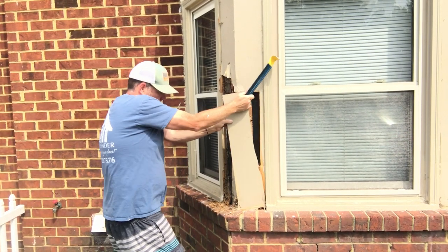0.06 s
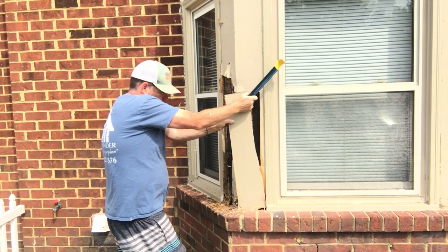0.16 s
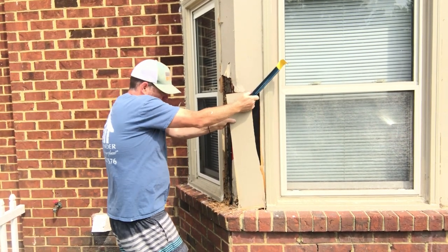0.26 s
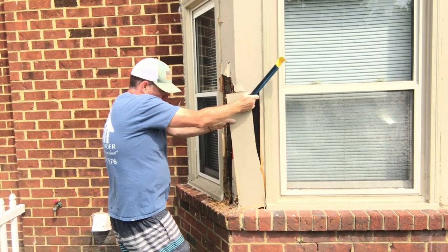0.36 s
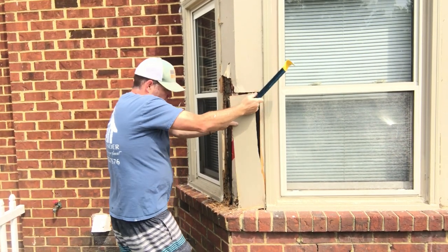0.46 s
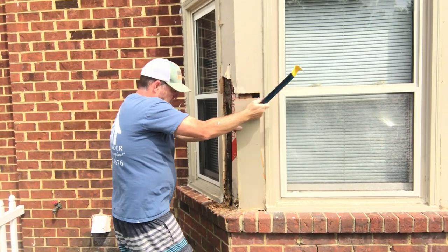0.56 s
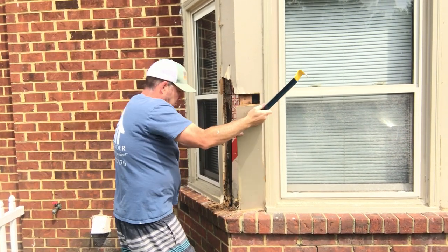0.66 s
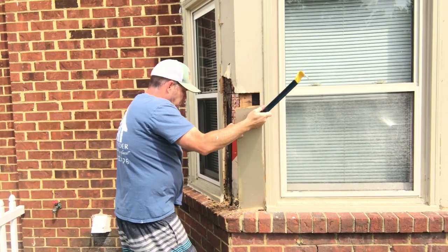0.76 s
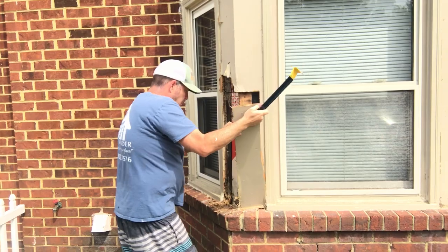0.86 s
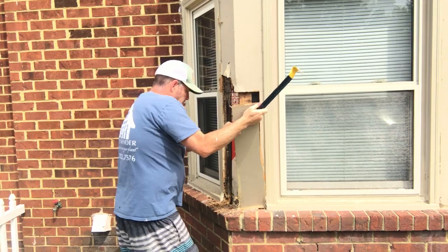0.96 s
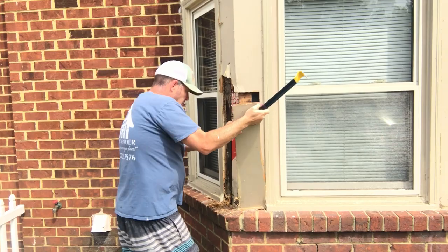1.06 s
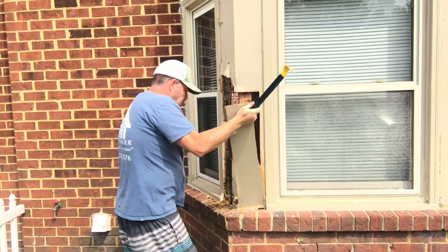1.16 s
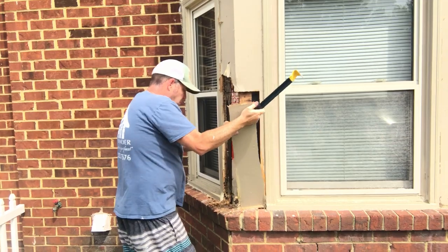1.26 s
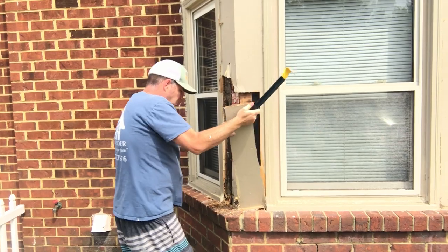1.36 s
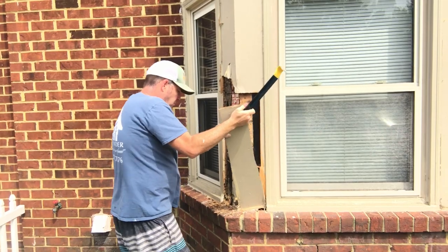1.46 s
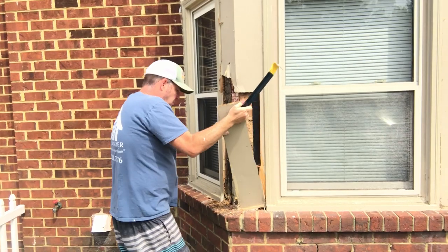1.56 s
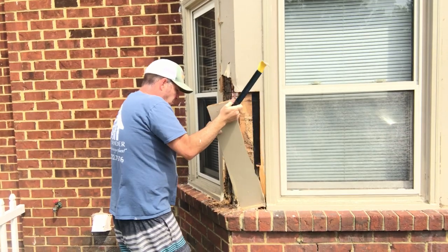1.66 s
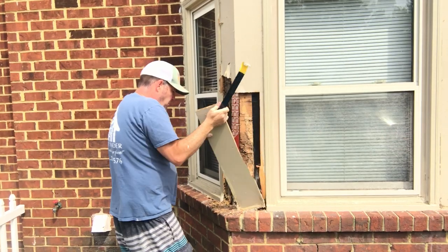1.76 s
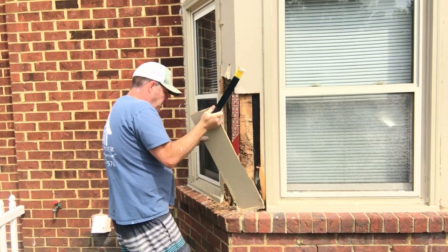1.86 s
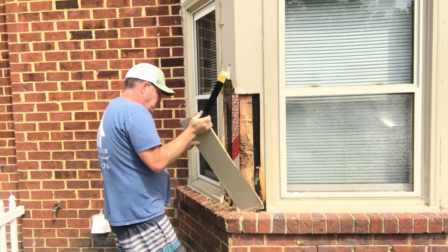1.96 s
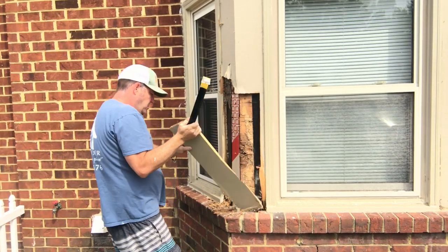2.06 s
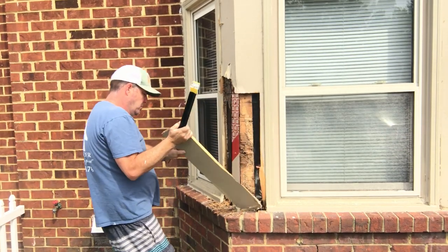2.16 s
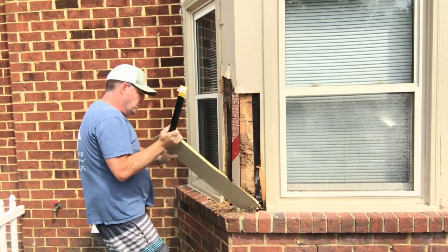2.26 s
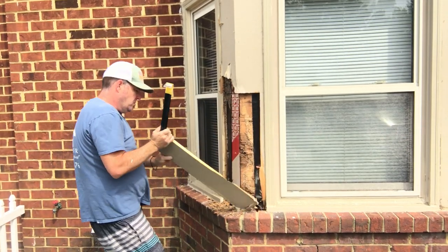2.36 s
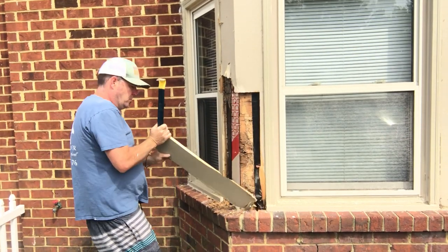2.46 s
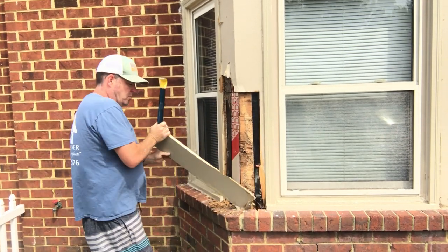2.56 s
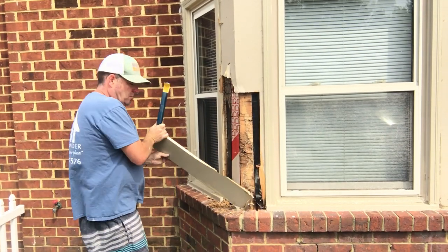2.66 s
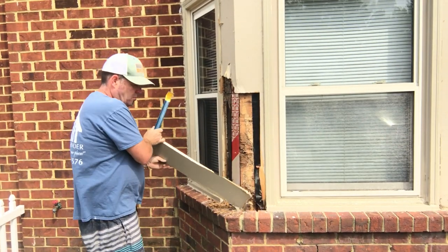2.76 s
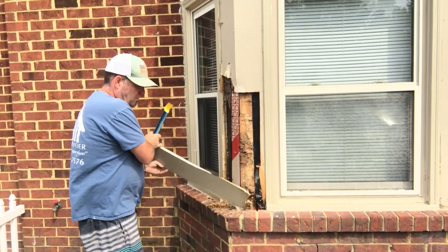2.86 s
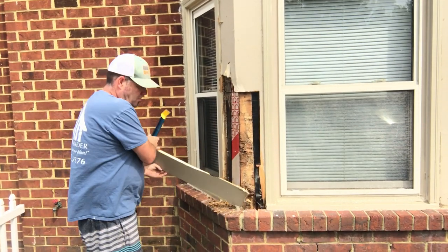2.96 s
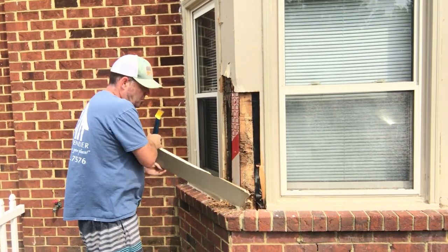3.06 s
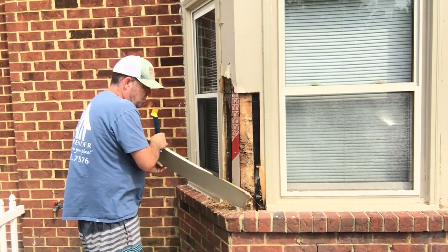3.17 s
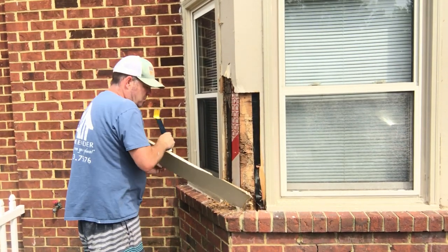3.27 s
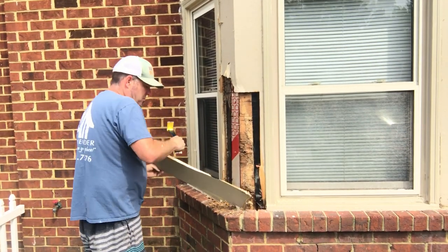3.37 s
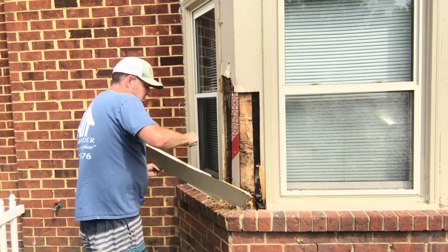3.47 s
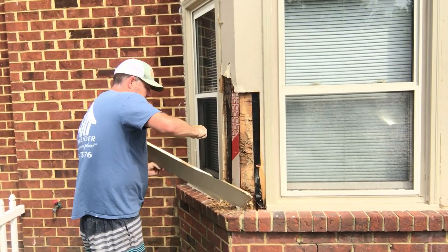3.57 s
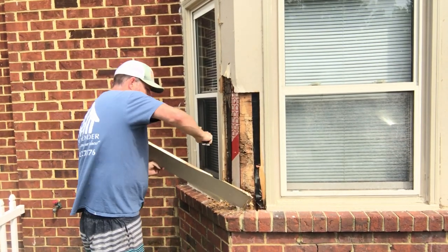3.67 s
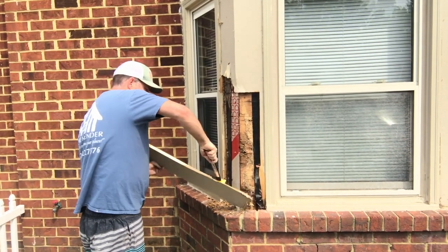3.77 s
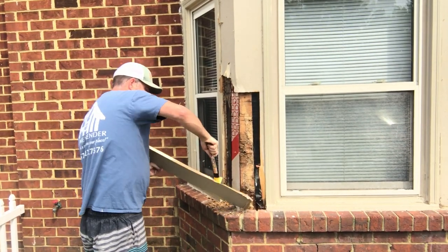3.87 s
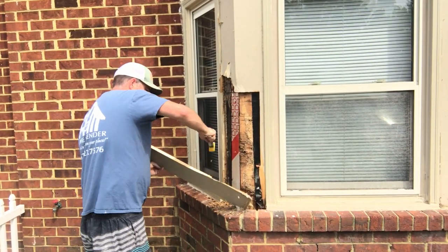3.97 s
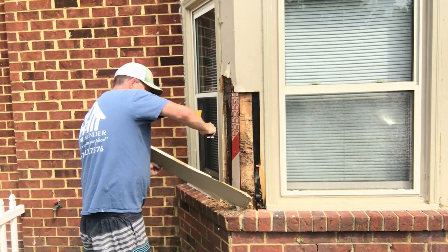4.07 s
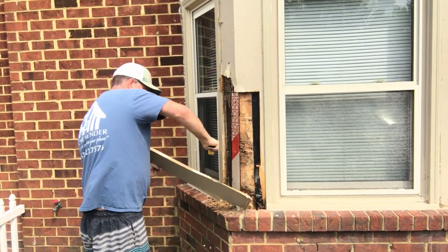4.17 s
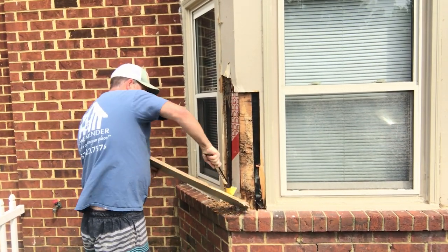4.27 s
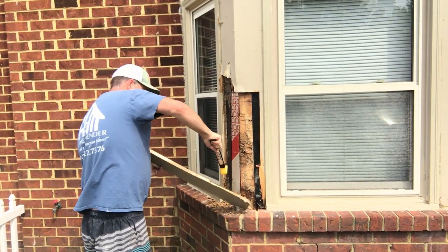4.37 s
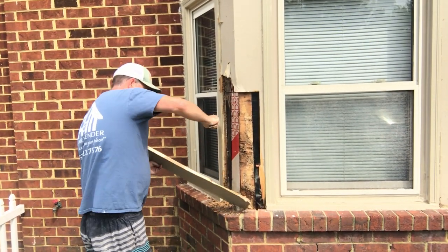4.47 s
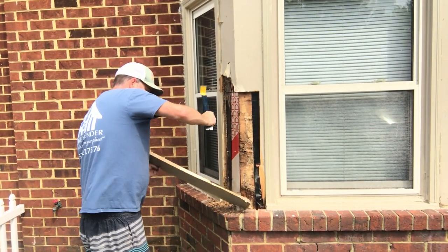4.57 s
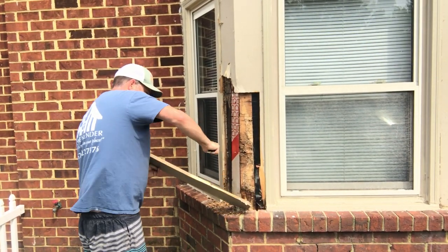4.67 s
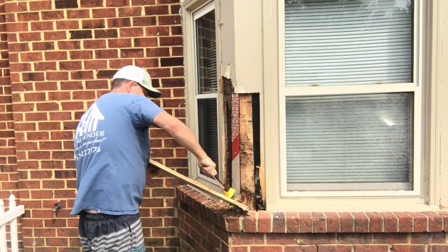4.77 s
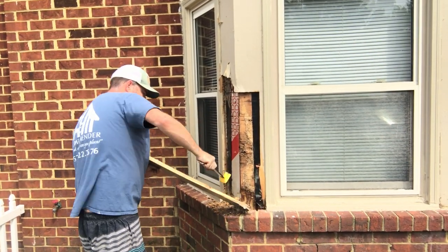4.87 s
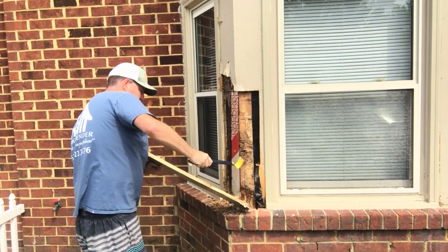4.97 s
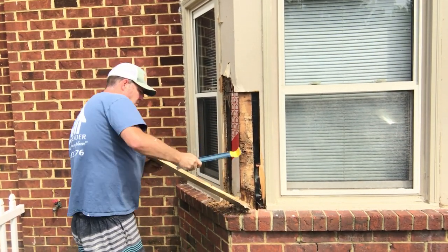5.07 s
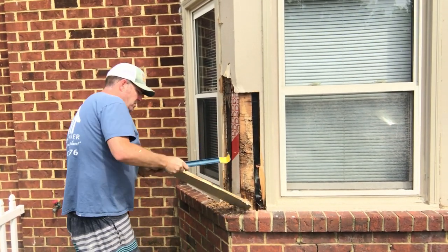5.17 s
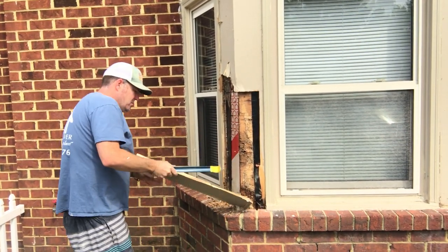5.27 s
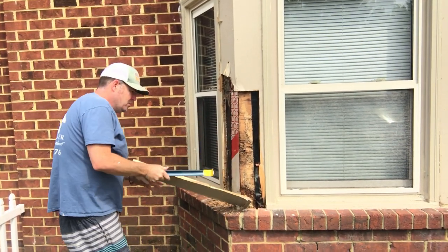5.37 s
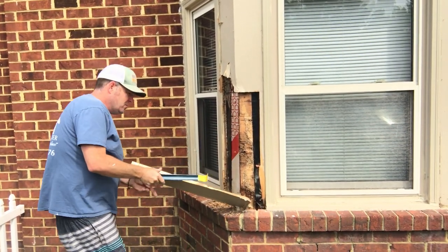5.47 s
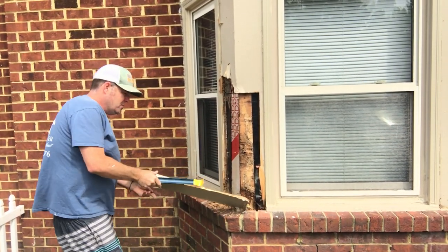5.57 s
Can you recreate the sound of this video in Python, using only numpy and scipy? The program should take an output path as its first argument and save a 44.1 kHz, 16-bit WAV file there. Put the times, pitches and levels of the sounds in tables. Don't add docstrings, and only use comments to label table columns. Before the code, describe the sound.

Wind rumbles and thumps on a microphone in a quiet suburban yard. Small fibre snaps and a few woody knocks come first, then a dense, jerky nail creak, a quick rising squeal, tearing and crumbs. After a lull, a steel bar hits the hanging board three times about half a second apart, hollow and loud with fast rebounds and late echoes. Faint pulsing insects, distant traffic and a fan drone lie behind.

```python
import sys
import numpy as np
from scipy import signal
from scipy.fft import rfft, irfft, next_fast_len
from scipy.io import wavfile
from scipy.ndimage import uniform_filter1d

SR = 44100
rng = np.random.default_rng(int(sys.argv[2]) if len(sys.argv) > 2 else 0)


def digitize_waveform(pressure):
    field = np.atleast_2d(pressure).T
    bounded = np.clip(field, -1, 1)
    quanta = np.round(bounded * 32767).astype(np.int16)
    wavfile.write(sys.argv[1], SR, quanta)


def gain_from_db(level_db):
    decades = np.asarray(level_db, float) / 20
    return 10 ** decades


N = 247401
TIME = np.arange(N) / SR

# [t/s, ring level/dB, crack level/dB, treble re crack/dB, ring tilt/dB per octave]
BAR_BLOWS = [(3.8378, 5.5, -4, -41, 2.5), (3.853, -11.5, -19, -11, 1.5), (3.864, -15, -25, -15, -8),
             (3.8745, -7, -14.5, -28, 2), (3.893, -18.5, -35, -15, 9), (4.2875, 6.5, -3, -23.5, -1),
             (4.297, -9, -30, -11, 2), (4.308, -21, -23, -2, -6), (4.3196, -9, -36, -22, 5),
             (4.339, -24, -36, -15, -1), (4.349, -31, -48, -15, 0), (4.7815, 6, -7, -19, 4.5),
             (4.801, -12, -19, -19, 12), (4.8072, -1.5, -10.5, -27, 6), (4.82, -13, -25, -21, 0),
             (4.833, -26, -29, -19, 4), (4.851, -32, -29, -15, 2)]
# [f/Hz, level/dB, t60/s]
TREBLE_MODES = [(3700, 2.5, 0.0074), (3884, -13, 0.02), (4240, -6.5, 0.012), (5120, -12, 0.009),
                (5700, -7, 0.0048), (6800, -20, 0.0045), (8700, -22.5, 0.0042), (10900, -30, 0.001)]
# [f/Hz, level/dB, t60/s]
NAILED_BOARD = [(341, -8.5, 0.046), (544.5, 3.5, 0.04), (593.5, -6, 0.066), (832, 7, 0.024),
                (990, -13, 0.034)]


def evened(x):
    return x / np.sqrt(np.mean(x ** 2) + 1e-20)


def read(points, hz):
    f, value = np.transpose(points)
    return np.interp(np.log(hz + 1), np.log(f + 1), value)


def curve(rows, axis=1):
    rows = np.array(rows)
    return np.interp(TIME, rows[:, 0], rows[:, axis])


def add(mix, s, sound):
    part = mix[round(s * SR):][:len(sound)]
    part += sound[:len(part)]


def smoothed(x, size):
    return uniform_filter1d(uniform_filter1d(x, size), size)


def colour(x, points):
    size = next_fast_len(len(x))
    gain = gain_from_db(read(points, np.fft.rfftfreq(size, 1 / SR)))
    return evened(irfft(rfft(x, size) * gain, size)[:len(x)])


def lumps(width_s):
    return evened(smoothed(rng.standard_normal(N), max(round(width_s * SR), 2)))


def grains(per_second, spread_db):
    strength = gain_from_db(spread_db * np.minimum(rng.exponential(1, N), 4))
    return strength * rng.standard_normal(N) * (rng.random(N) < per_second / SR)


def bursts(starts, holds, levels_db, rise_db_s, fall_db_s):
    t = TIME[::64, None]
    drop_db = rise_db_s * np.maximum(starts - t, 0) + fall_db_s * np.maximum(t - starts - holds, 0)
    return np.interp(TIME, t[:, 0], np.sqrt((gain_from_db(levels_db - drop_db) ** 2).sum(1)))


def resonate(x, hz, width_hz):
    r = np.exp(-np.pi * width_hz / SR)
    return signal.lfilter([1 - r], [1, -2 * r * np.cos(2 * np.pi * hz / SR), r * r], x)


def ring(modes, rise_s, chance, detune):
    t = np.arange(5000)[:, None] / SR
    hz, db, t60 = np.transpose(modes)
    level_luck, pitch_luck, phase_luck = chance * rng.standard_normal((len(hz), 3)).T
    decay = gain_from_db(db + 4 * level_luck - 60 * t / t60)
    waves = np.sin(2 * np.pi * hz * (1 + detune * pitch_luck) * t + 1.03 * phase_luck)
    sound = (decay * waves).sum(1) * (1 - np.exp(-t[:, 0] / rise_s)) ** 2
    return sound / np.sqrt(uniform_filter1d(2 * sound ** 2, size=120).max())


def reflections(decays, start_s, rise_s):
    taps = np.zeros(SR)
    at = np.arange(0, SR - 20, 20) + rng.integers(0, 20, SR // 20 - 1)
    taps[at] = rng.choice([-1., 1.], len(at))
    hz, t, z = signal.stft(taps, SR, nperseg=256)
    tail = signal.istft(z * gain_from_db(-60 * t / read(decays, hz)[:, None]), SR, nperseg=256)[1]
    tail = tail * (1 - np.exp(-np.arange(len(tail)) / SR / rise_s))
    return np.r_[np.zeros(round(start_s * SR)), tail / np.linalg.norm(tail)]


def blows():
    # [f/Hz, level/dB, t60/s]
    loose_board = [(286, -14.5, 0.082), (327, -10, 0.043), (392, -4.5, 0.074), (450, -11, 0.022),
                   (529, -5, 0.063), (571, -6, 0.044), (607.5, -0.5, 0.063), (705, 3, 0.022),
                   (845, -11.5, 0.078), (877, -9.5, 0.051), (886.3, 1, 0.069), (980, -10.5, 0.02),
                   (1062, -10.5, 0.047), (1155, -9.5, 0.022)]
    # [f/Hz, level/dB, t60/s]
    struck_modes = [(1316, 3, 0.024), (1544, -5.5, 0.085), (1730, -4.5, 0.04), (2500, 11, 0.0023),
                    (1954, 11.5, 0.021), (2070, 5, 0.0085), (2360, 3.5, 0.039), (2498, -0.5, 0.059),
                    (2600, 7, 0.012), (3310, -20, 0.036), (2910, -13, .03), (3840, -22, 0.012),
                    (4130, -15, 0.08)]
    out, shake, t = np.zeros(N), np.zeros(N), np.arange(5000) / SR
    pressed_db = 8.5 / (1 + np.exp((t - .0145) / .0025))
    for s, ring_db, crack_db, treble_db, tilt_db in BAR_BLOWS:
        tilted = [(hz, db + tilt_db * np.log2(hz / 700), t60) for hz, db, t60 in loose_board]
        add(out, s, gain_from_db(crack_db) * ring(struck_modes, 0.00026, 0.37, 0.022))
        add(out, s, gain_from_db(crack_db + treble_db) * ring(TREBLE_MODES, 0.00014, 0.31, 0.035))
        add(out, s + .0006, gain_from_db(ring_db - 7.0 + pressed_db) * ring(tilted, 0.00085, 0.4, 0.0041))
        add(shake, s, gain_from_db(ring_db - 14.5 - 60 * t / 0.11))
    highpass = signal.butter(2, 170, "high", fs=SR, output="sos")
    return signal.sosfilt(highpass, out + shake * clatter())


def clatter():
    # [f/Hz, level/dB per Hz]
    rattle = [(200, -14), (400, 14.5), (900, 4.5), (1500, 1.5), (2500, -4.5), (3500, -10.5), (4500, -23.5),
              (8000, -40), (16000, -62)]
    z = signal.stft(colour(rng.standard_normal(N), rattle), SR, nperseg=128)[2]
    patches = uniform_filter1d(rng.standard_normal(z.shape), size=2, axis=0)
    patches = evened(uniform_filter1d(patches, size=3, axis=1))
    return evened(signal.istft(z * gain_from_db(3.2 * patches), SR, nperseg=128)[1][:N])


def nail_slips():
    # [t/s, tick level/dB, board level/dB, treble re tick/dB, tick f/Hz]
    single_jerks = [(1.7367, -29, -18.5, -16, 1770), (1.7525, -21, -20.5, -2, 1840),
                    (1.7584, -37, -41, -19, 1620), (1.7704, -17, -10.5, -12, 2030),
                    (1.9445, -40, -39.5, 1, 2460), (1.9885, -25.5, -43, -6, 2310),
                    (2.0005, -25.5, -28, -8.5, 1900), (2.1538, -49, -21.5, -30, 1570),
                    (2.1835, -49, -32, -15, 1460), (2.1939, -19.5, -13, -15.5, 2130),
                    (2.2066, -26, -17, -23, 1870), (2.309, -43, -31, -17, 2000),
                    (2.3168, -41, -30, -19, 1720), (2.3235, -43, -30, -17, 2000),
                    (2.3302, -36, -30, -12, 1870)]
    # [t/s, tick level/dB, board level/dB, tick f/Hz]
    notches = [(1.7834, -22, -16, 2000), (1.7955, -29, -20, 2100), (1.8076, -29.5, -19.5, 1590),
               (1.8194, -24, -22.5, 1950), (1.8383, -24, -17.5, 2230), (1.8623, -21, -17.5, 1770),
               (1.8875, -24, -21.5, 2100), (1.9105, -25.5, -22, 1920), (1.931, -25, -20.5, 2000),
               (1.9489, -28, -20, 2280), (1.9646, -25, -18.5, 1900), (1.9774, -22.5, -18.5, 2100),
               (1.9924, -23, -17.5, 2000), (2.0051, -23.5, -16.5, 2100), (2.0169, -24, -17.5, 1900),
               (2.0302, -26, -18.5, 1800), (2.042, -23, -16.5, 2170), (2.0564, -25, -14, 2180),
               (2.0671, -25, -18, 2300), (2.0778, -24, -18.5, 1870), (2.0883, -29, -20.5, 1990),
               (2.1013, -28, -18.5, 1960), (2.1149, -23, -16.5, 2500), (2.1258, -28, -22, 2180),
               (2.139, -26.5, -18, 2160)]
    out = np.zeros(N)
    for row in single_jerks:
        jerk(out, *row, NAILED_BOARD, .28)
    for s, tick_db, board_db, hz in notches:
        treble_db = -19 + 10 * np.log2(hz / 2000) + 4.5 * rng.standard_normal()
        jerk(out, s, tick_db, board_db, treble_db, hz, NAILED_BOARD, .28)
    return out


def squeal():
    # [t/s, jerks per s, tick level/dB, board level/dB]
    run = [
        (2.2175, 139, -35, -25),
        (2.243, 144, -31, -24),
        (2.248, 123, -30, -23),
        (2.27, 128, -29, -24),
        (2.292, 134, -31, -24),
        (2.297, 137, -38, -30),
    ]
    # [t/s, f/Hz]
    glide = [
        (2.22, 1410),
        (2.29, 2160),
    ]
    out = np.zeros(N)
    running = (TIME > run[0][0]) & (TIME < run[-1][0])
    turns = np.ceil(np.cumsum(curve(run) * running) / SR)
    tick_db, board_db = curve(run, axis=2), curve(run, axis=3) - 1.5
    for i in np.flatnonzero(np.diff(turns)):
        late_s, louder_db, higher_hz = rng.standard_normal(3) * [.0001, 1.3, 60]
        hz = np.interp(i / SR, *np.transpose(glide)) + higher_hz
        jerk(out, i / SR + late_s, tick_db[i] + louder_db, board_db[i], -14, hz, NAILED_BOARD, .09)
    return out


def splitting():
    # [t/s, tick level/dB, board level/dB, treble re tick/dB, tick f/Hz]
    snaps = [(0.1115, -37.5, -52, -6, 2080), (1.1645, -36.5, -34, -20, 2100), (1.2257, -36, -53, -5, 3030),
             (1.4132, -44, -59, -5, 2360), (1.5056, -31.5, -40, -27, 2090), (2.393, -45, -32, 2, 2040),
             (2.4647, -38, -36, -8, 2070), (2.5058, -44, -36, -18, 1820), (2.561, -48, -36, -14, 2000),
             (2.644, -44, -55, 3, 2240), (2.6557, -35.5, -29, -7, 1480), (2.7406, -39, -37, 1.5, 2200),
             (5.2998, -42, -53, -12, 1480)]
    # [t/s, tick level/dB, tick f/Hz]
    pops = [(0.096, -47, 2150), (.1027, -51, 2150), (.4659, -50, 2150), (.602, -47, 2300),
            (.667, -50, 2900), (0.6842, -42, 2290), (0.716, -42, 1500), (.7225, -51, 2400),
            (0.748, -54, 2390), (0.7805, -45, 2670), (.828, -47, 2700), (1.31, -45, 2150),
            (1.4593, -44, 2180), (1.496, -41, 2170), (1.5143, -47, 2130), (1.7273, -49, 2150),
            (2.1647, -42, 2800), (2.371, -43, 2610), (2.4265, -44, 2150), (2.47, -39.5, 3200),
            (2.5792, -35, 2320), (2.5864, -39, 2000), (2.5917, -40, 2300), (2.5993, -37, 2300),
            (2.607, -37, 1820), (2.6138, -41, 2120), (2.632, -45, 1830), (2.674, -43, 2700),
            (2.7086, -46, 2600), (2.731, -54, 2900), (2.784, -46, 2700), (4.7615, -39, 2150)]
    # [t/s, tick level/dB, board level/dB, knock f/Hz, tick f/Hz]
    cracks = [
        (0.0767, -44, -27.5, 450, 2050),
        (.584, -37.5, -19.5, 880, 1240),
        (.7084, -23.5, -14, 710, 1670),
        (0.767, -30, -22, 950, 1750),
        (2.347, -21, -26, 1150, 2570),
    ]
    # [f/Hz, level/dB, t60/s]
    rotten_wood = [(246, 1, 0.034), (505, 6, 0.015), (876, 1.5, 0.018), (1060, -14.5, 0.011)]
    # [f/Hz, level/dB per Hz]
    splinters = [(300, -23), (600, -1), (1200, 13), (2000, -3), (2800, 5.5), (4200, -8), (6000, -26),
                 (10000, -54), (14000, -77)]
    out, burst, t = np.zeros(N), np.zeros(N), np.arange(3000) / SR
    breaks = [(*row, rotten_wood) for row in snaps]
    breaks += [(s, db, db - 3, -19, hz, rotten_wood) for s, db, hz in pops]
    for s, tick_db, board_db, knock_hz, tick_hz in cracks:
        part = [(hz, db - 4 * abs(np.log2(hz / knock_hz)), t60) for hz, db, t60 in rotten_wood]
        breaks.append((s, tick_db, board_db, -14, tick_hz, part))
        tail = [(hz, db, t60 * 1.45) for hz, db, t60 in part + NAILED_BOARD]
        add(out, s + 0.00216, gain_from_db(board_db - 10.5) * ring(tail, 0.0014, 0.77, 0.046))
    for s, tick_db, *rest in breaks:
        jerk(out, s, tick_db, *rest, .35)
        add(burst, s, gain_from_db(tick_db - 7 - 60 * t / 0.035) * (1 - np.exp(-t / 0.00011)))
    return out + burst * colour(rng.standard_normal(N), splinters)


def jerk(out, s, tick_db, board_db, treble_db, tick_hz, board, chance):
    # [f/Hz, level/dB, t60/s]
    stiff_modes = [(1244, 3, 0.025), (1440, 1, 0.03), (1620, 11, 0.012), (1870, 11.5, 0.009),
                   (2004, 7.5, 0.016), (2254, 8.5, 0.016), (2550, 2.5, 0.019), (3170, -4, 0.022),
                   (3200, -25, 0.0056)]
    sound = np.zeros(5100)
    contact = [(1.237 * tick_hz, 5, .007), (0.7 * tick_hz, 3, .007)]
    tick = leaning(stiff_modes, tick_hz, 8) + contact
    add(sound, 0, gain_from_db(tick_db + treble_db) * ring(TREBLE_MODES, .00025, 1.2 * chance + .3, .05))
    add(sound, .0002, gain_from_db(tick_db) * ring(tick, .0003, chance, .03))
    add(sound, .001, gain_from_db(board_db) * ring(board, 0.0004, .75 * chance, 0.05))
    add(out, s, sound)


def leaning(modes, centre_hz, db_per_octave):
    pull = (centre_hz / 1850) ** .3
    return [(hz * pull, db - db_per_octave * abs(np.log2(hz / centre_hz)), t60) for hz, db, t60 in modes]


def tearing():
    # [start t/s, hold/s, level/dB]
    tears = [
        (0.11, .01, -45.5),
        (0.176, 0.71, -68),
        (1.218, 0.019, -49.5),
        (1.39, 0.11, -55),
        (1.729, .02, -47),
        (1.846, 0.28, -55),
        (2.326, 0.17, -47.5),
        (2.586, 0.024, -51),
        (2.715, 0.086, -48),
        (2.847, 0.21, -58),
    ]
    # [f/Hz, level/dB per Hz]
    crumbs = [(300, -11), (600, 14.5), (1200, -8), (2000, -5), (2700, 4.5), (3500, -6), (6000, -31),
              (10000, -37)]
    clumped = grains(6000, 2.6) * gain_from_db(2.2 * lumps(.004))
    return bursts(*np.transpose(tears), 345, 251) * colour(clumped, crumbs)


def scraping():
    # [start t/s, hold/s, level/dB]
    scrapes = [
        (2.562, .012, -50.5),
        (2.58, 0.031, -37.5),
        (2.225, .065, -40),
        (2.305, 0.026, -48),
    ]
    # [f/Hz, level/dB per Hz]
    grit = [(300, -26), (550, 6), (900, -5), (1400, -13), (2000, -3.5), (2700, -2), (3800, -19),
            (8000, -40)]
    return bursts(*np.transpose(scrapes), 900, 800) * colour(grains(1500, 4), grit)


def echoes():
    # [delay t/s, level/dB]
    houses = [
        (.174, 3),
        (.36, -8),
    ]
    # [f/Hz, t60/s]
    street = [(300, 0.35), (900, 0.35), (2500, 0.59), (6000, 0.76), (14000, 0.18)]
    # [f/Hz, level/dB per Hz]
    returned = [(180, -52), (300, -6.5), (619, 4.5), (896, -0.5), (1060, -6), (1150, -11), (1520, -14.5),
                (2250, -18), (7000, -48), (9100, -80), (15400, -120)]
    starts = np.zeros(N)
    for s, ring_db, *_ in BAR_BLOWS:
        for delay_s, db in houses:
            add(starts, s + delay_s, gain_from_db([ring_db + db]))
    wash = signal.fftconvolve(starts, reflections(street, 0, .035))[:N]
    return gain_from_db(-48.5) * colour(wash, returned)


def wind():
    # [start t/s, hold/s, rumble level/dB, flutter re rumble/dB]
    gusts = [(0.042, 0.017, -28.5, -12), (0.164, 0.064, -26, -8), (0.279, 0.14, -24.5, -4),
             (0.568, 0.018, -20, -7), (0.657, 0.17, -30.5, -8.5), (0.85, 0.11, -23.5, -3.5),
             (1.005, 0.085, -29, -15.5), (1.189, 0.0082, -20.5, -10), (1.318, 0.016, -17, -2),
             (1.465, 0.012, -28, -2), (1.603, 0.017, -23, -6.5), (1.74, .01, -33, -9),
             (1.83, 0.018, -26, -4.5), (1.976, .015, -32, -14), (2.093, 0.039, -27.5, -1),
             (2.203, 0.11, -36, 0), (2.385, 0.064, -19.5, -5.5), (2.615, 0.011, -28.5, -6.5),
             (2.725, 0.0091, -36, -13), (2.794, 0.0091, -36.5, 4), (2.926, 0.026, -29, -6),
             (3.115, 0.11, -35.5, -12), (3.299, 0.0087, -41, -4.5), (3.483, 0.093, -24.5, -13.5),
             (3.634, 0.007, -24.5, -3), (3.747, 0.0098, -17, -14), (3.89, 0.33, -27.5, -9.5),
             (4.374, 0.15, -27, -11.5), (4.764, 0.011, -16, -16), (5.022, 0.015, -19.5, -31)]
    # [t/s, level/dB]
    lull = [(0, -35.5), (2.5, -29.5), (3.4, -33), (4.56, -44.5), (4.62, -32), (4.95, -30), (5.15, -37.5),
            (5.3, -37.5), (5.44, -40.5), (5.55, -35), (5.61, -46)]
    # [f/Hz, level/dB per Hz]
    rumble = [(15, -37.5), (30, -2), (55, 4.5), (90, 2), (130, -8.5), (200, -35), (400, -85.5)]
    # [f/Hz, level/dB per Hz]
    quick = [(60, -43.5), (120, 2), (160, 1.5), (220, -7), (330, -18.5), (600, -46.5), (1500, -95)]
    start, hold, level_db, flutter_db = np.transpose(gusts)
    breeze = gain_from_db(curve(lull))
    thump = np.hypot(breeze, bursts(start, hold, level_db, 294, 262))
    eddies = np.hypot(breeze * gain_from_db(-10), bursts(start, hold, level_db + flutter_db, 273, 281))
    flutter = buffet(quick, 0.065) * gain_from_db(2.0 * lumps(0.019) + 3.5 * lumps(0.03))
    return thump * buffet(rumble, 0.15) + eddies * flutter


def buffet(points, window_s):
    x = colour(rng.standard_normal(N), points)
    own_power = smoothed(x ** 2, round(window_s * SR))
    return evened(x / (abs(own_power) + .05) ** .38)


def insects():
    # [t/s, level/dB]
    chorus = [
        (0, -68),
        (1, -67),
        (2, -62),
        (2.8, -65),
        (3.2, -61),
        (3.6, -61),
        (4.2, -57.5),
        (4.8, -60),
        (5.61, -57),
    ]
    # [f/Hz, width/Hz, level/dB]
    wings = [(3850, 360, -5.5), (4215, 740, 2.5), (4830, 1100, -7), (3290, 360, -5.5)]
    throb_hz, throb_at_s = 13.07, 2.874
    phase = 2 * np.pi * throb_hz * (TIME - throb_at_s) + .3 * lumps(.06)
    throb = np.clip(.5 + np.cos(phase), .25, 1) * gain_from_db(1.5 * lumps(.04))
    rasp = rng.standard_normal(N)
    song = sum(gain_from_db(db) * evened(resonate(resonate(rasp, hz, w), hz, w)) for hz, w, db in wings)
    return gain_from_db(curve(chorus)) * evened(song * throb)


def hush():
    # [f/Hz, level/dB per Hz]
    distance = [(150, -28), (250, -10), (380, -8), (452, -9.5), (484, -12), (566, -13.5), (618, -10),
                (1260, -22), (1550, -26), (2090, -26), (2400, -23.5), (3400, -30), (4260, -30.5),
                (7570, -41), (16000, -38.5)]
    # [f/Hz, level/dB]
    capsule = [(9600, 0), (10500, -4), (11500, 0), (15800, 0), (16200, -40)]
    air = colour(colour(rng.standard_normal(N), distance), capsule) * gain_from_db(.6 * lumps(.15))
    drone = evened(resonate(rng.standard_normal(N), 565.0, 18))
    return gain_from_db(-49) * air + gain_from_db(-54.5) * drone


def scene():
    # [f/Hz, t60/s]
    yard = [(300, 0.22), (900, 0.2), (2500, 0.19), (6000, 0.25), (14000, 0.15)]
    work = blows() + nail_slips() + squeal() + splitting() + tearing() + scraping()
    near = signal.fftconvolve(work, reflections(yard, .006, .004))[:N]
    air = echoes() + wind() + insects() + hush()
    return (work + gain_from_db(-15.0) * near + air)[None]


def roll_off(x):
    return signal.sosfilt(signal.butter(12, 16940, fs=SR, output="sos"), x)


def record(dry):
    heard = signal.sosfilt(signal.butter(2, 46, "high", fs=SR, output="sos"), dry)
    overloads = np.cumsum(abs(heard[0]) > .8)
    held = overloads - np.r_[np.zeros(round(.17 * SR)), overloads][:N] > 0
    duck_db = -3.6 * signal.fftconvolve(held, np.hanning(4400) / 2200)[:N]
    clipped = np.clip(heard * gain_from_db(duck_db), -1, 1)
    return roll_off(signal.lfilter([.18, .64, .18], 1, clipped))


dry = scene()
out = record(dry)
digitize_waveform(out)
```